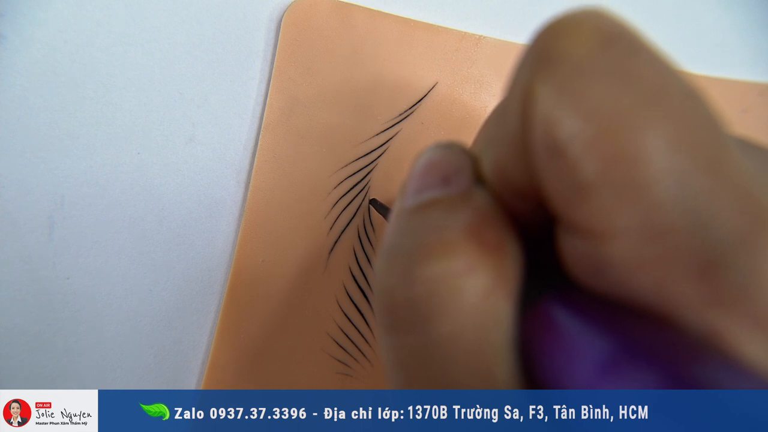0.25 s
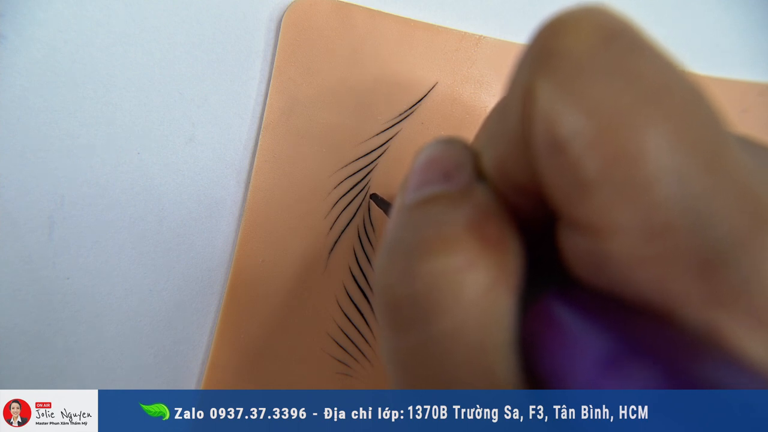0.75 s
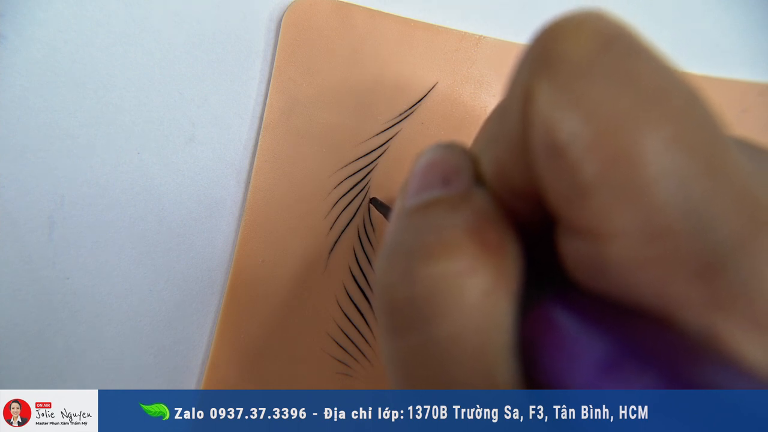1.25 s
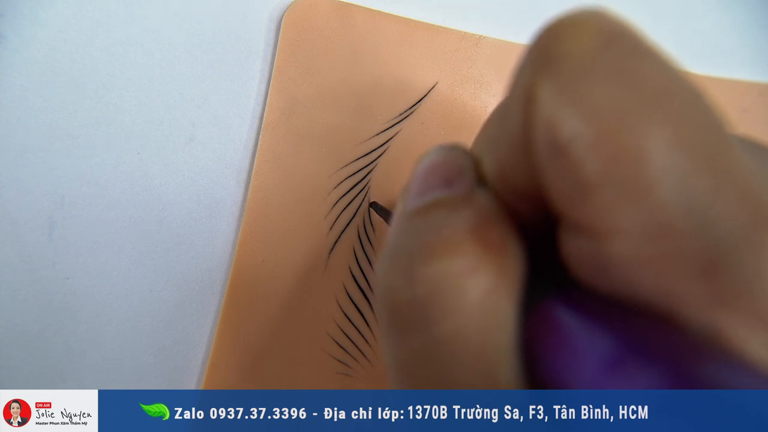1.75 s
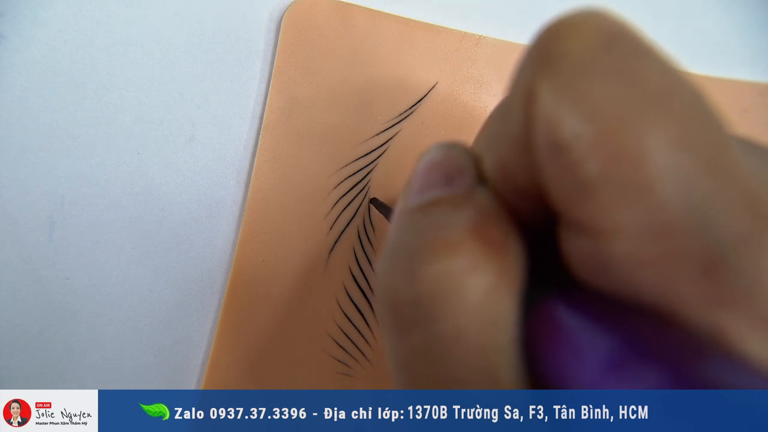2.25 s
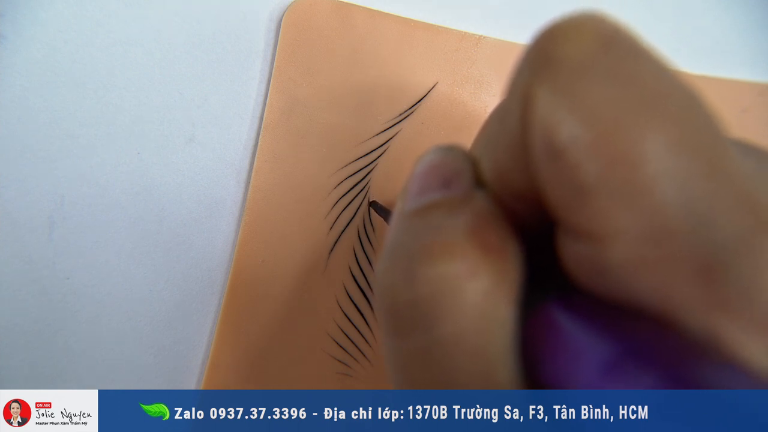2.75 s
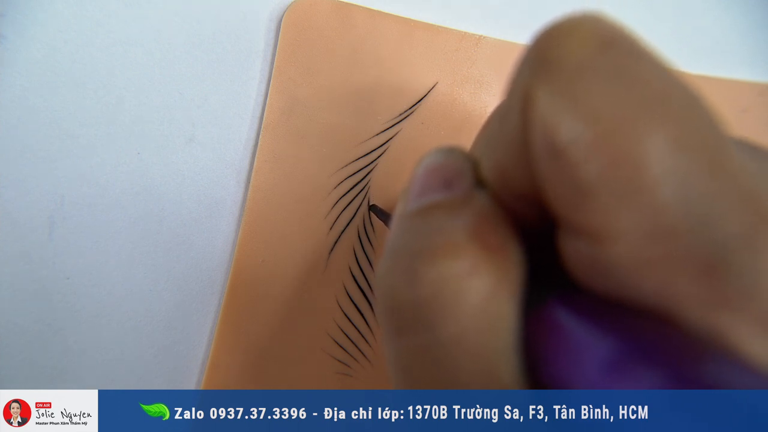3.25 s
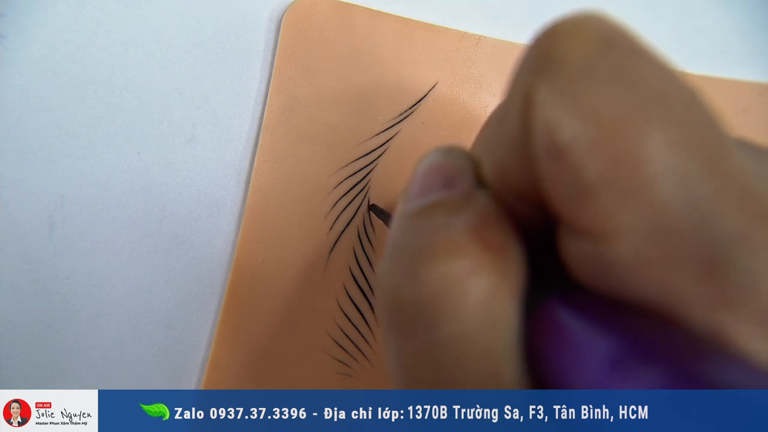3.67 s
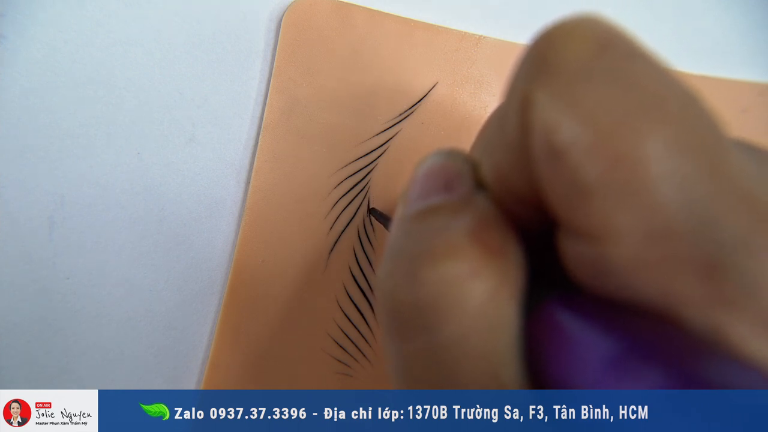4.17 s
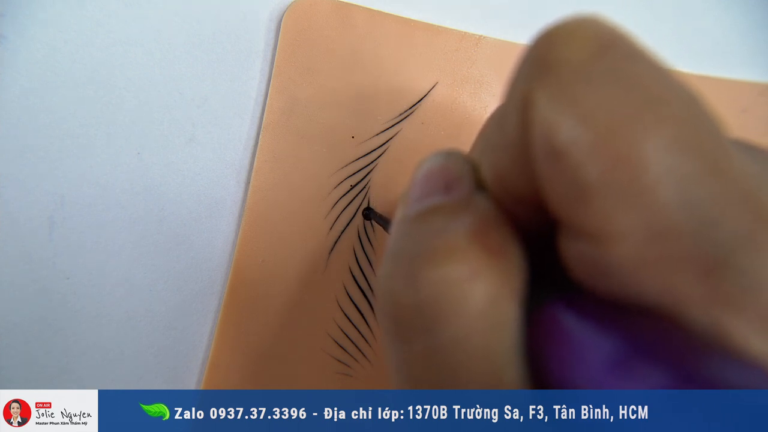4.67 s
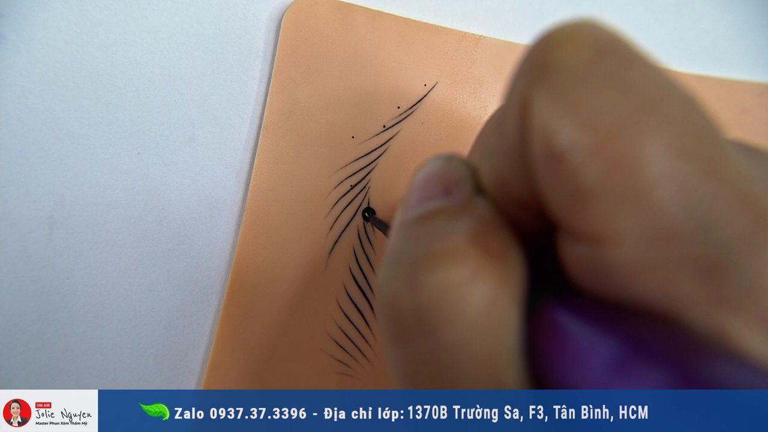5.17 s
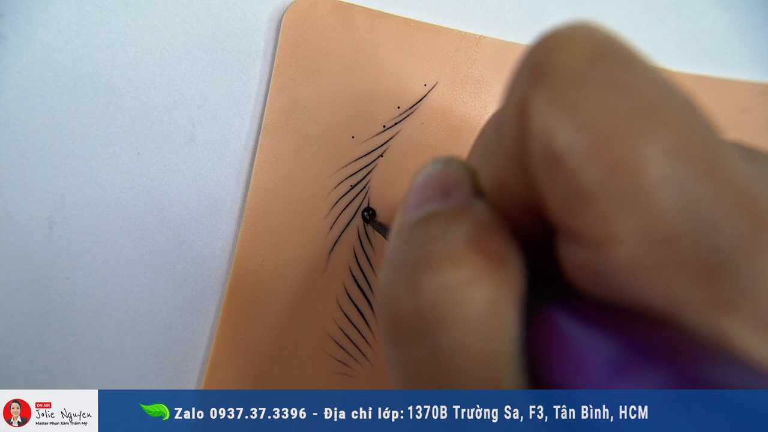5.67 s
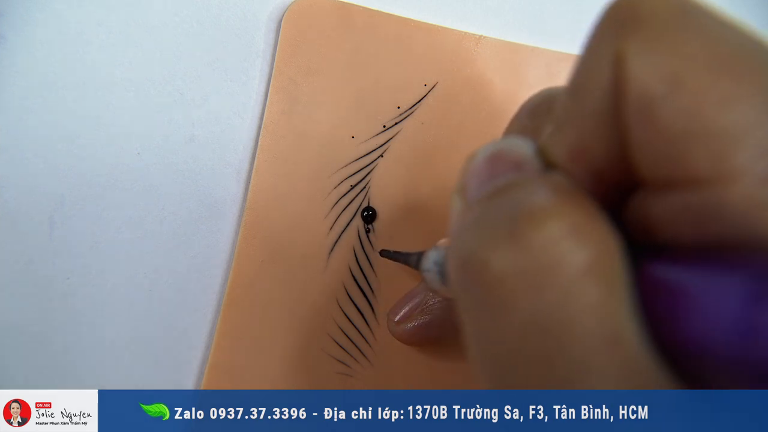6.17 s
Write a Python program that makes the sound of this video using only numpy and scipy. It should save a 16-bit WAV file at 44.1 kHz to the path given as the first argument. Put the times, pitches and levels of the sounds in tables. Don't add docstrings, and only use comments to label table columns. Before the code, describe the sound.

A small needle pen whirs with a thin, steady electric buzz over a low street rumble, then a loud sharp snap hits the table near the end.

```python
import sys
import numpy as np
from scipy import signal
from scipy.fft import rfft, irfft
from scipy.io import wavfile
from scipy.ndimage import uniform_filter1d

SR = 44100
rng = np.random.default_rng(int(sys.argv[2]) if len(sys.argv) > 2 else 0)


def gain_from_decibels(decibels):
    exponent = np.asarray(decibels, float) / 20
    return 10 ** exponent


def put_to_file(sound):
    columns = np.atleast_2d(sound).T
    safe = np.clip(columns, -1, 1)
    whole_steps = np.round(safe * 32767)
    wavfile.write(sys.argv[1], SR, whole_steps.astype(np.int16))


N = 283563

# (time [s], speed [turns per s])
MOTOR_SPEED = [(0, 138.82), (1.0, 138.85), (1.6, 138.85), (1.82, 138.69), (2.08, 138.93), (2.44, 138.93),
               (2.62, 138.76), (2.9, 138.91), (3.2, 138.8), (4.05, 138.85), (4.25, 138.75), (4.69, 138.75),
               (4.81, 138.63), (4.95, 138.71), (5.5, 138.8), (5.81, 138.57), (6.2, 138.61), (6.43, 138.75)]
# (frequency [Hz], at first [dB], leaning on [dB], turning away [dB], lifted [dB])
POSE_COLOURS = [(1820, 1, 0, -2, -6), (2080, -7, 5, 3, -14), (2580, 0.7, 4, 4.5, -4), (3140, 6, -2, -2, 19),
                (3330, -0.5, 3, 1, 18), (3470, 3.5, -9, -1, 18), (3770, 1.6, 1, -3, 1),
                (4800, -1.5, -3.2, -5, 17), (7300, 2.5, 1.5, -2, -4), (8100, 6, -22, -7, 10),
                (9470, 0, 4, -1, -3), (10100, 0.5, 0, 1.5, 8), (10500, -1, 2.5, -4, -20),
                (11600, 9.5, -9, -1, -16), (11500, 1, 1.5, -4, -17), (12600, 3, -1, -1, -14),
                (13700, 1, 5, 0, -8), (15000, 0.5, 4.5, -2, -8)]


def walk(rate):
    hold = int(SR / rate)
    steps = np.repeat(rng.standard_normal(N // hold + 1), hold)
    smooth = uniform_filter1d(uniform_filter1d(steps, hold), hold)
    return 0.436 * smooth[:N]


def shaped(gain):
    f = np.arange(N // 2 + 1) * SR / N + 1e-3
    return irfft(rfft(rng.standard_normal(N)) * gain(f), N)


def pen(t):
    # (time [s], pose [0-3])
    hand_pose = [(0, 0.06), (1.5, 0.07), (3, 0.38), (4.5, 0.76), (5.5, 0.69), (6.0, 1.2), (6.1, 1.87),
                 (6.22, 2), (6.3, 2.17), (6.35, 2.3), (6.43, 2.53)]
    speed = np.interp(t, *np.transpose(MOTOR_SPEED)) + 0.056 * walk(8)
    turns = np.cumsum(speed) / SR - .07
    pose = np.clip(np.interp(t, *np.transpose(hand_pose)) + 0.13 * walk(1.37), 0, 3)
    away = np.clip((pose - 1) / 2, 0, 1)
    lift = np.clip(pose - 2, 0, 1)
    return motor_knocks(turns, pose) + drive_whine(t, turns, away) + loose_play(turns, away, lift) + rustle(lift)


def motor_knocks(turns, pose):
    knocks = 0
    for number, colour_db in enumerate(np.transpose(POSE_COLOURS)[1:]):
        share = np.clip(1 - abs(pose - number), 0, 1)
        knocks = knocks + share * every_turn(turns, colour_db)
    return knocks * gain_from_decibels(1.1 * walk(4.64))


def every_turn(turns, colour_db):
    grip_steps = [(0.078, 0.12), (0.4132, -0.64), (0.449, 1.0), (0.6208, -0.52), (0.7423, -0.41),
                  (0.8643, -0.42)]
    rod_steps = [(0.0505, 0.36), (0.2113, 0.35), (0.394, 0.59), (0.534, -0.23), (0.7088, 0.34),
                 (0.8561, 1.0)]
    can_steps = [(0.0628, -0.12), (0.1997, -1.0), (0.3625, 0.91), (0.5511, -0.55), (0.71, -0.4),
                 (0.8687, -0.4)]
    cap_steps = [(0.0326, -0.56), (0.1876, 1.0), (0.3588, 0.33), (0.5148, -0.6), (0.7199, -0.5),
                 (0.878, 0.57)]
    # (frequency [Hz], width [Hz], level [dB], sign [+1 or -1])
    grip_modes = [(1548, 173, -63.5, -1), (1787, 250, -61.7, 1), (2203, 322, -72.9, 1),
                  (2521, 126, -65.5, -1), (3302, 382, -59.7, -1), (3764, 232, -49.7, -1),
                  (4331, 1166, -53.9, 1)]
    rod_modes = [(4531, 380, -77.0, 1), (5297, 1030, -73.5, 1), (6040, 1311, -67.3, -1),
                 (6285, 519, -66.3, 1), (6728, 127, -69.0, 1)]
    can_modes = [(8395, 265, -76.7, 1), (9337, 214, -62.5, 1), (10111, 289, -59.4, 1),
                 (10440, 150, -57.8, -1), (11433, 289, -56.5, -1)]
    cap_modes = [(11801, 109, -61.4, 1), (12378, 101, -66.3, 1), (12824, 169, -78.6, -1),
                 (13181, 102, -73.4, 1), (15233, 231, -73.6, -1)]
    parts = [(grip_steps, grip_modes, 10, 32), (rod_steps, rod_modes, 32, 55),
             (can_steps, can_modes, 55, 82), (cap_steps, cap_modes, 82, 114)]
    usual_speed = np.mean(np.array(MOTOR_SPEED)[:, 1])
    colour_hz = np.array(POSE_COLOURS)[:, 0]
    lines = np.zeros(4097, complex)
    for knocks, modes, first, last in parts:
        order = np.arange(first, last)[:, None]
        f = order * usual_speed
        hz, width, db, sign = np.transpose(modes)
        place, strength = np.transpose(knocks)
        ring = 1j * f * width / (hz ** 2 - f ** 2 + 1j * f * width)
        body = (sign * gain_from_decibels(db) * ring).sum(axis=1)
        blows = (strength * np.exp(-2j * np.pi * order * place)).sum(axis=1)
        lines[first:last] = body * blows * gain_from_decibels(np.interp(f[:, 0], colour_hz, colour_db))
    one_turn = irfft(lines) * 8192 / np.sqrt(2)
    return np.interp(turns % 1, np.arange(8193) / 8192, np.resize(one_turn, 8193))


def drive_whine(t, turns, away):
    # (multiple of the chopping rate [ratio], multiple of the turn rate [ratio], rms level [dB])
    whine_tones = [(1, -9, -66), (1, -3, -59), (1, 0, -63), (1, 3, -60), (1, 6, -71), (1, 9, -96),
                   (1, 15, -95), (2, -6, -74), (2, -3, -73), (2, 0, -73), (2, 6, -73), (2, 12, -82),
                   (2, 15, -84), (2, 18, -79), (2, 21, -79), (2, 24, -77), (3, -15, -80), (3, -12, -85),
                   (3, -9, -80), (3, 0, -78), (3, 6, -78)]
    chop_hz = 4816.4
    whine = []
    for chops, per_turn, db in whine_tones:
        cycles = chops * chop_hz * t + per_turn * turns + rng.random()
        whine.append(gain_from_decibels(db + walk(2.1)) * np.sqrt(2) * np.sin(2 * np.pi * cycles))
    low = sum(whine[:7]) + 2.0 * away * whine[2] - 0.77 * away * (whine[1] + whine[3])
    high = (1 - .9 * away) * sum(whine[7:])
    return low + high


def loose_play(turns, away, lift):
    can = shaped(lambda f: gain_from_decibels(-72.0) / (1 + ((f - 10200) / 1300) ** 2)) * (1 - .8 * lift)
    cap = shaped(lambda f: gain_from_decibels(-72.0) / (1 + ((f - 14300) / 2500) ** 4)) * (1 - .8 * away)
    return (can + cap) * (1 + .5 * np.cos(2 * np.pi * turns))


def rustle(lift):
    skin = shaped(lambda f: gain_from_decibels(-44) / (1 + ((f - 6000) / 3200) ** 4))
    return skin * lift * gain_from_decibels(5 * walk(60))


def ticks(t):
    # (time [s], peak level [dB], ring pitch [Hz], time to fade by 60 dB [s], crack share [0-1])
    small_ticks = [(3.4678, -29, 4740, 0.0051, 0.1), (3.4676, -36, 6400, .004, .3),
                   (6.17, -48, 6800, .015, 0.3), (6.2322, -40, 6600, .02, 0.25),
                   (6.233, -39, 4660, 0.016, 0.1), (6.2545, -42, 7000, 0.0067, .7),
                   (6.2715, -40, 6840, 0.011, .3), (6.2941, -22, 3530, .006, 0.15),
                   (6.3006, -9.5, 3720, 0.0045, 0.15), (6.3010, -15, 6150, .009, .3),
                   (6.3027, -16, 1500, .012, .1), (6.3031, -17, 7000, .008, .8),
                   (6.3079, -16, 3700, .005, .1), (6.3025, -31, 13300, .005, 0),
                   (6.3015, -18, 5000, .006, .2), (6.3008, -21, 7200, .006, .2),
                   (6.343, -36, 5800, 0.008, 0.3), (6.405, -44, 7800, .02, .3)]
    out = np.zeros(N)
    after = np.arange(1024) / SR
    colour = signal.butter(2, [2200, 8000], "band", fs=SR, output="sos")
    for s, db, hz, t60, crack in small_ticks:
        noise = 1.7 * signal.sosfilt(colour, rng.standard_normal(len(after)))
        ring = -np.sin(2 * np.pi * hz * after)
        tick = gain_from_decibels(db) * ((1 - crack) * ring + crack * noise) * gain_from_decibels(-60 * after / t60)
        start = int(s * SR)
        out[start:start + len(after)] += tick
    return out


def knock(t):
    # (time [s], signed peak [full scale], rise [s], fall [s])
    table_blows = [
        (6.30272, -1.0, .00009, .00011),
        (6.30296, -.27, .00008, .00015),
        (6.3037, .58, .00018, .0007),
    ]
    pushes = 0
    for s, peak, rise, fall in table_blows:
        pushes = pushes + peak * np.exp(-np.where(t < s, (s - t) / rise, (t - s) / fall))
    boom_hz, boom_t60_s, boom_db = 99, 0.092, -25
    after = np.maximum(t - table_blows[-1][0], 0)
    fade = gain_from_decibels(boom_db - 60 * after / boom_t60_s)
    onset = 1 - np.exp(-after / 0.0011)
    return pushes + fade * np.sin(2 * np.pi * boom_hz * after + 1.1) * onset


def room(t):
    return air() + drones() + rumble(t)


def air():
    # (frequency [Hz], level [dB per Hz])
    air_colour = [(22, -48), (40, -9), (75, -10.5), (140, -2), (320, -9.5), (580, -8), (800, -12),
                  (1130, -11), (1500, -19.5), (2300, -28), (3500, -35.5), (4600, -38), (7500, -44),
                  (15500, -44.5)]
    hz, db = np.transpose(air_colour)
    swell, out = walk(2.34), 0
    for octave in range(-6, 5):
        def band(f):
            overlap = np.clip(1 - abs(np.log2(f / 1000) - octave), 0, 1) ** .5
            return gain_from_decibels(np.interp(np.log(f), np.log(hz), db)) * overlap
        depth = np.clip((3 - octave) / 5, .2, 1)
        out = out + shaped(band) * gain_from_decibels((.5 * swell + 2.6 * walk(4.07)) * depth)
    return out * gain_from_decibels(-35) / np.sqrt(np.mean(out ** 2))


def drones():
    # (frequency [Hz], width [Hz], rms level [dB])
    room_drones = [(113.4, 7.9, -48), (159.8, 9.3, -62), (190.7, 5.7, -51)]
    # (frequency [Hz], width [Hz], rms level [dB])
    rumble_bed = [(76, 4.1, -55.5), (137, 21, -58), (247, 16, -51), (300, 23, -51)]
    out = 0
    for hz, width, db in [*room_drones, *rumble_bed]:
        drone = shaped(lambda f: 1 / (1 + (2 * (f - hz) / width) ** 2)) * gain_from_decibels(8.3 * walk(1.33))
        out = out + drone * gain_from_decibels(db) / np.sqrt(np.mean(drone ** 2))
    return out


def rumble(t):
    # (time of the peak [s], pitch [Hz], peak rms level [dB], length [s])
    street_swells = [(.9, 76, -46, 0.13), (1.42, 76, -45, .35), (1.863, 76, -40.5, 0.22),
                     (2.318, 76, -38.5, .12), (2.485, 76, -40.5, .12), (4.67, 76, -42, 0.4),
                     (4.84, 76, -50, 0.14), (5.334, 76, -43.5, 0.44), (5.98, 76, -48, .3),
                     (.1, 137, -43.5, 0.16), (0.903, 137, -38.5, 0.18), (1.435, 137, -41, 0.47),
                     (1.86, 137, -42, .2), (2.476, 137, -41, 0.12), (3.0, 137, -41, 0.18),
                     (3.795, 137, -39, 0.35), (4.21, 137, -44, 0.35), (4.854, 137, -45, .15),
                     (5.397, 137, -44, 0.35), (5.827, 137, -43, .4), (6.27, 137, -49, .3),
                     (.06, 247, -43.5, .3), (1.005, 247, -46.5, 0.24), (2.77, 247, -50, 0.19),
                     (4.04, 247, -48, 0.26), (4.84, 247, -41, 0.11), (5.99, 247, -49, 0.2),
                     (5.947, 410.4, -45, 0.26), (3.2, 300, -48, 0.6), (5.84, 300, -46, 0.75)]
    out = np.zeros(N)
    waver = np.cumsum(5.44 * walk(8)) / SR
    for s, hz, db, length in street_swells:
        near = slice(max(int((s - 2 * length) * SR), 0), int((s + 2 * length) * SR))
        bell = np.exp(-(2 * (t[near] - s) / length) ** 2)
        tone = np.sqrt(2) * np.sin(2 * np.pi * (hz * t[near] + waver[near]))
        out[near] += gain_from_decibels(db) * bell * tone
    return out


def scene():
    t = np.arange(N) / SR
    return (pen(t) + ticks(t) + knock(t) + room(t))[None]


def roll_off(x):
    return signal.sosfilt(signal.butter(12, 16500, fs=SR, output="sos"), x)


def record(dry):
    low_cut = signal.butter(2, 38, "high", fs=SR, output="sos")
    top_cut = signal.ellip(12, .1, 40, 15740, fs=SR, output="sos")
    mix = signal.sosfiltfilt(top_cut, signal.sosfilt(low_cut, dry))
    return roll_off(mix)


dry = scene()
out = record(dry)
put_to_file(out)
```